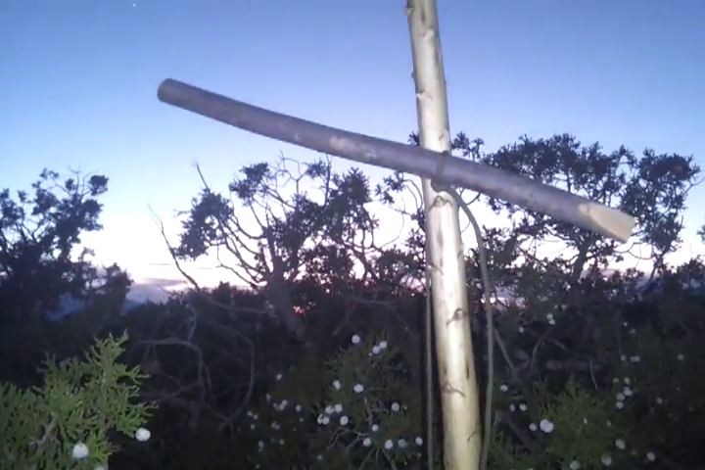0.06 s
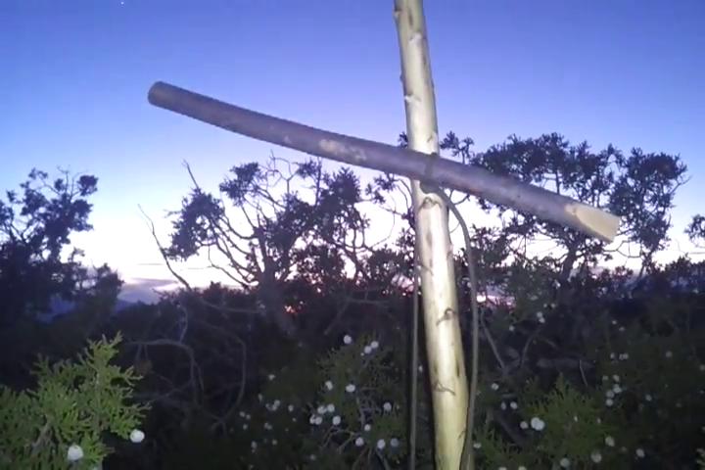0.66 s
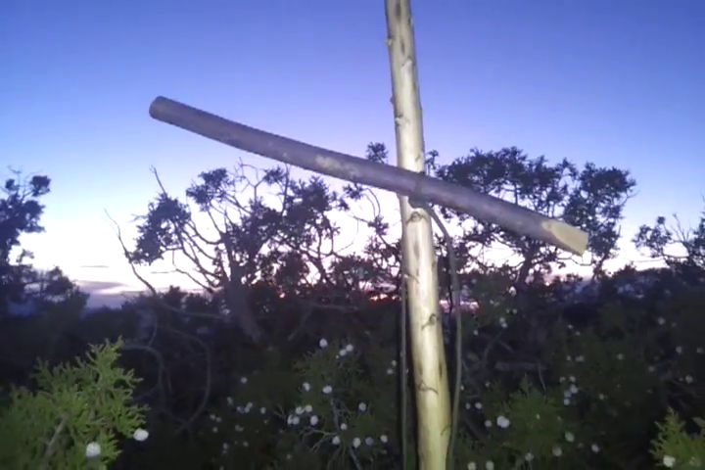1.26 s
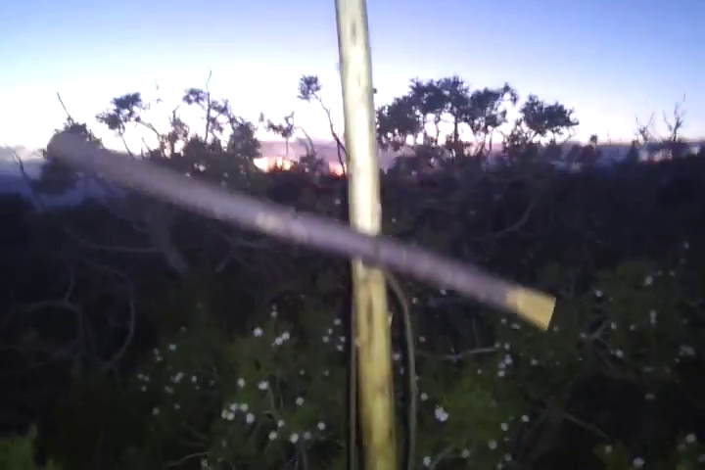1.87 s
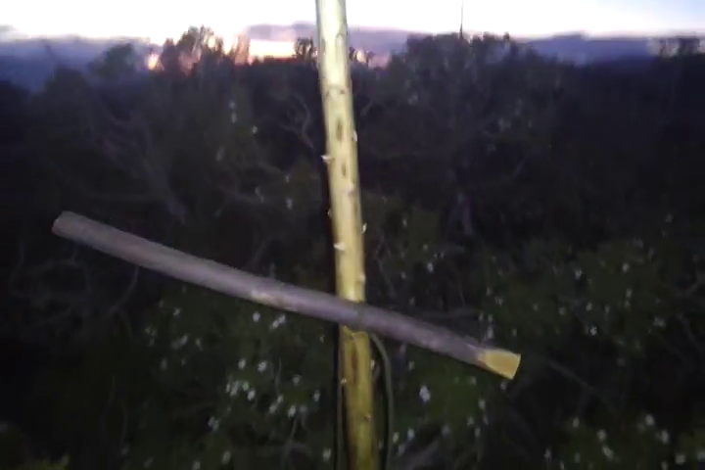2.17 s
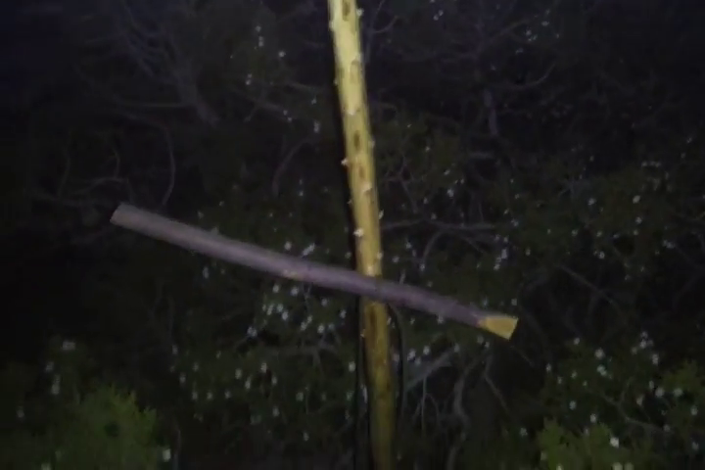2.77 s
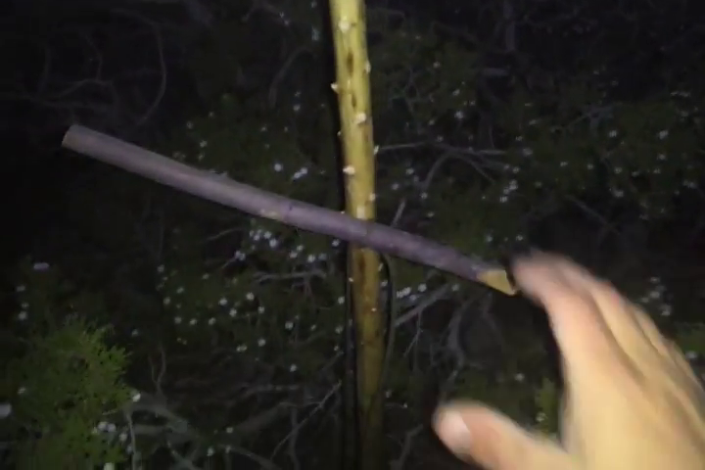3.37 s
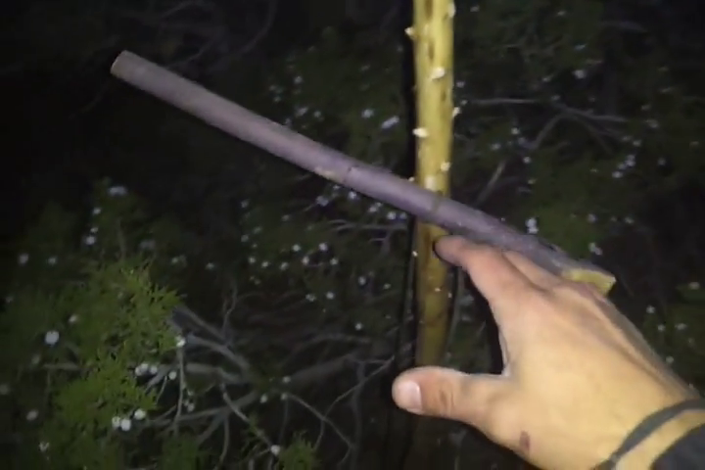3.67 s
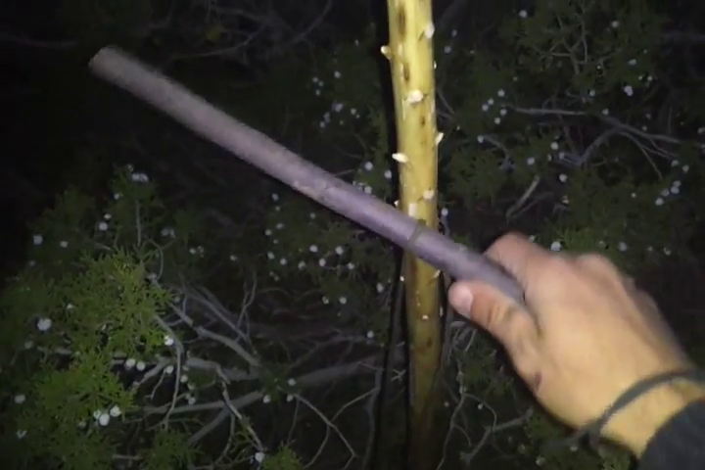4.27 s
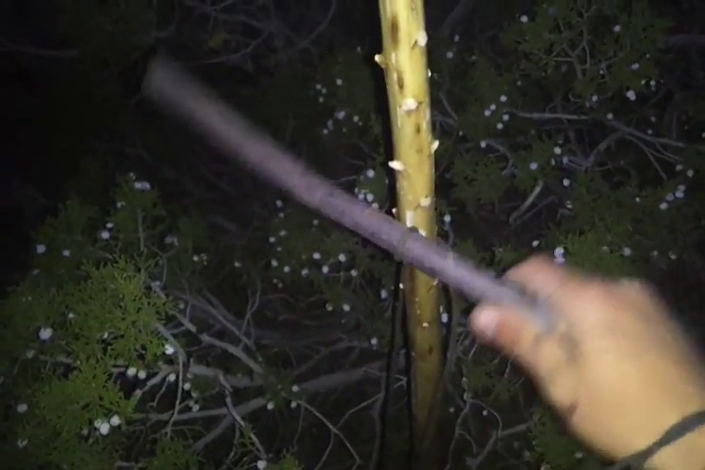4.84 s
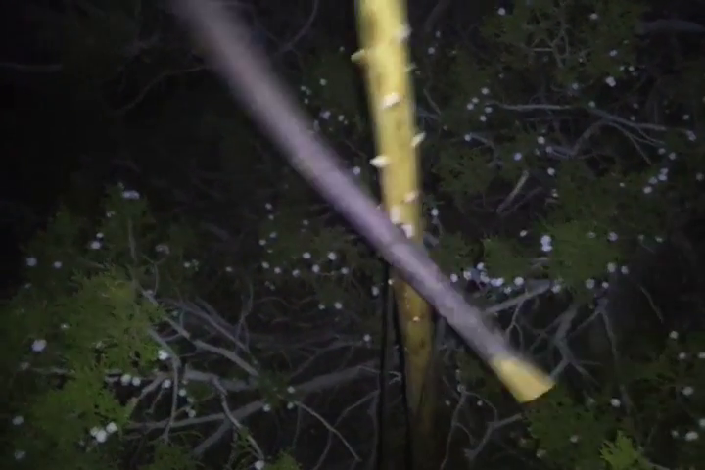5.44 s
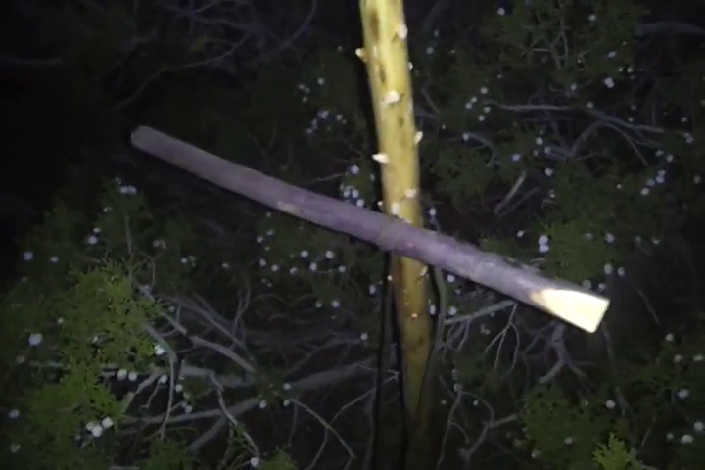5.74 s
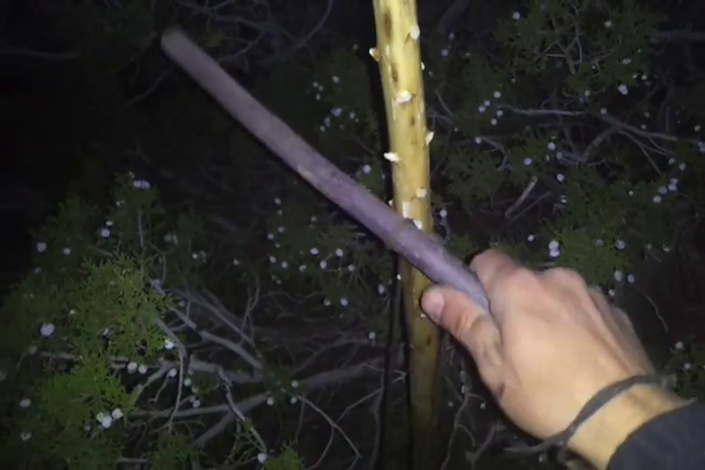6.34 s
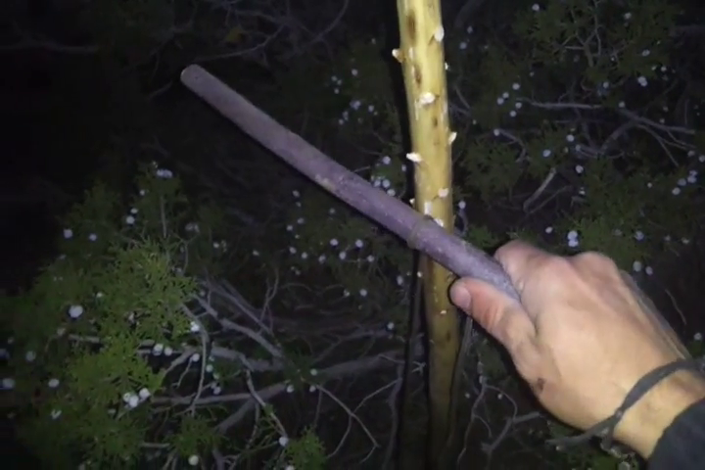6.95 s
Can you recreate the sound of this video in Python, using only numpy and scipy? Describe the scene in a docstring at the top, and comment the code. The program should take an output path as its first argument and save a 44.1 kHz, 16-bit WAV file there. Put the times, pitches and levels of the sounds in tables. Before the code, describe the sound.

Clothes rustle and twigs tick over a quiet outdoor hush, then a wooden perch scrapes, clacks loudly and is grabbed again.

```python
"""A wooden perch at dusk

In still scrub, someone with a hand-held camera works a perch wedged in a pole. It scrapes in its hole
by stick-slip friction, is let go with a rattling clack as impacts ring the wood, and is gripped again.
Twigs tick, clothes rustle by friction, and turbulent air bumps the microphone over a steady hush."""
import sys
import numpy as np
from scipy import signal
from scipy.fft import rfft, irfft, next_fast_len
from scipy.io import wavfile
from scipy.ndimage import map_coordinates

SR = 44100
rng = np.random.default_rng(int(sys.argv[2]) if len(sys.argv) > 2 else 0)


def to_wav(s):
    """Save 16-bit WAV."""
    ch = np.atleast_2d(s).T  # columns
    pcm = np.round(np.clip(ch, -1, 1) * 32767)  # PCM
    wavfile.write(sys.argv[1], SR, pcm.astype(np.int16))


N = 317961

# impacts of perch on pole: t/s, level/dB, body gain/dB, edge gain/dB, share of the free ring time
IMPACTS = [(5.4092, -35.5, -20, 42, 0.26), (5.45, -27.5, -12, -8, 0.89), (5.4576, -32, 2.5, 4, 0.79),
           (5.4624, -36, 11, 9, 0.9), (5.4845, -38, 15, -18, 0.95), (5.4905, -40, 6, -5, 1),
           (5.4956, -40, 10, -9, 0.8), (5.519, -34, 4.5, -7, 0.78), (5.574, -61, -4, -7, .3),
           (5.607, -56, 2, -2, 1), (5.623, -57, 9, -3, 1), (5.7476, -62, 4, 9, 0.96)]
# modes of perch and pole: f/Hz, bandwidth/Hz, level/dB
WOOD_MODES = [(287, 84, -6.5), (340, 33, -2.5), (835, 70, -12), (1043, 48, -1.5), (1155, 68, -9),
              (1250, 110, -8), (1450, 64, -6), (1660, 61, -12), (1830, 79, -9), (2080, 61, -2),
              (2640, 87, -14.5), (3150, 60, -10), (3150, 33, -6.5), (4280, 56, -1), (4580, 60, 1),
              (4860, 57, -8), (5580, 130, -5.5), (6140, 54, -10), (6420, 66, -6)]
# spectrum of the contact noise: f/Hz, level/dB
CRACK_SPECTRUM = [(88, -52.5), (150, -19), (291, -6), (512, -17.5), (1030, -5), (1210, -12.5), (2320, -4),
                  (3130, 2), (3750, -11), (5590, -14), (7920, -36), (10300, -66), (17400, -120)]


def clack():
    """Impact excitation: each contact gives a pulse, a short crack and the damped modes of the wood."""
    out, t = np.zeros(N), np.arange(SR // 6) / SR
    t60 = lambda width: np.log(1000) / np.pi / width
    for start, db, body_db, edge_db, share in IMPACTS:
        fade = lambda free_t60: amp(-60 * t / (free_t60 * share))
        ring = np.zeros(len(t))
        for hz, width, mode_db in WOOD_MODES:
            strength = amp(mode_db + rng.normal(0, 1)) * np.sqrt(width)
            phase = 2 * np.pi * hz * t + rng.normal(0, 1)  # the modes start roughly in step
            ring -= strength * np.sin(phase) * fade(t60(width))
        noise = filtered(rng.standard_normal(len(t)), colour(CRACK_SPECTRUM))
        crack = band(noise, 500, 2820) * fade(0.045) + band(noise, 2590, 5800) * fade(0.031)
        pulse = -band(t == 0, 490, 5900)
        hit = unit(ring) + amp(-1) * unit(crack) + amp(-11) * unit(pulse)
        # a glancing contact is all edge, a square one has body
        body = amp(body_db) * band(hit, 260, 1500, order=1)
        middle = amp(-5) * band(hit, 1200, 4000, order=1)
        edge = amp(edge_db + 1.5) * band(hit, 4930, 5520, order=1)
        add(out, start, amp(db) * unit(band(body + middle + edge, 260, 8000, order=4)))
    return out


# turns of the perch in its hole: t/s, duration/s, level/dB, fall over the stroke/dB
PERCH_TURNS = [(3.925, 0.082, -50.5, 6), (4.13, 0.083, -52.5, -3.5), (4.37, .16, -58, -2),
               (4.665, 0.055, -58, -4), (4.82, 0.092, -57, -2.5), (4.965, 0.15, -51.5, -3.5),
               (5.115, 0.066, -49.5, 4.5), (5.3, 0.1, -52.5, 0), (5.385, 0.036, -48.5, -5),
               (5.413, 0.048, -40, -7), (5.47, 0.034, -37, -2), (5.547, 0.015, -42.5, -2),
               (5.578, 0.017, -44.5, -1), (5.63, 0.092, -54, -3), (6.262, 0.013, -41.5, -3),
               (6.275, 0.11, -44, 18), (6.405, 0.14, -48, 14.5), (7.18, 0.051, -52, -1)]
# modes of the rubbed perch: f/Hz, bandwidth/Hz, level/dB
PERCH_MODES = [(1734, 74, -3.5), (2040, 170, -4), (3080, 137, -2.5), (4616, 235, 3.5), (5280, 1830, -11),
               (6220, 240, -3), (6600, 110, -9)]
# jolts as the hand lands or the perch settles: t/s, peak level/dB
PERCH_JOLTS = [(3.453, -33), (4.198, -36), (5.709, -35), (6.261, -26), (6.267, -26)]


def scrape():
    """Stick-slip friction: dry fibres catch and slip, driving the perch's modes; a jolt rings them."""
    response = lambda hz: resonances(PERCH_MODES)(hz) + amp(-20) * (hz > 500) / (1 + (hz / 6500) ** 8)
    bark_grip = amp(2.5 * wobble(80))
    slips = unit(filtered(grains(per_s=3000, spread_db=5), response))
    out = strokes(PERCH_TURNS) * bark_grip * slips
    impulse = np.arange(SR // 16) == 0
    ring = filtered(impulse, resonances(PERCH_MODES[:4]))
    for start, db in PERCH_JOLTS:
        add(out, start, amp(db) * ring / np.abs(ring).max())
    return out


# flicks of twigs and sleeve (the row at 3.456 s is the hand landing on the perch): t/s, relative level/dB,
# f/Hz, treble share/dB
TWIG_FLICKS = [(0.289, -26, 785, -11.5), (.513, -41, 1500, 0), (.563, -46, 2500, -3), (.727, -45, 2500, -4),
               (1.475, -24, 1150, -27), (1.501, -27.5, 1250, -15), (1.566, -30, 1650, -30),
               (1.899, -30.5, 1370, -12), (1.999, -35, 2110, -19.5), (2.01, -28.5, 1800, -21),
               (2.025, -25.5, 2240, -29), (2.095, -27, 1950, -29), (2.106, -28, 2080, -22),
               (2.416, -33, 1450, -8), (2.456, -36, 1350, -6.5), (2.848, -28, 1380, -11.5),
               (2.969, -34, 2760, -21), (3.086, -32.5, 2260, -6.5), (3.123, -30.5, 2560, -14),
               (3.447, -22.5, 700, -12.5), (3.456, -27.5, 1000, -8), (3.551, -27.5, 2360, -5.5),
               (3.695, -37, 2300, -15), (3.757, -33.5, 1890, -29), (3.887, -33.5, 1620, -10),
               (3.91, -32, 1890, -23), (3.952, -30, 1430, -19), (3.988, -29, 1550, -16),
               (4.423, -30.5, 1320, -1), (4.526, -32.5, 1500, 0), (6.3032, -28.5, 3150, 0)]
# snaps of dry needles: t/s, relative level/dB
NEEDLE_SNAPS = [(1.392, -35.5), (6.8149, -53)]


def ticks():
    """Damped transients: needles snap; twigs and folds give a dull knock with a brighter edge."""
    out, t = np.zeros(N), np.arange(SR // 12) / SR
    burst = lambda t60: rng.standard_normal(len(t)) * amp(-60 * t / t60) + 7 * (t == 0)
    for start, db in NEEDLE_SNAPS:
        add(out, start, amp(db - 22) * unit(band(burst(0.0083), 6500, 9300, order=3)))
    for start, db, hz, treble_db in TWIG_FLICKS + faint_flicks():
        t60 = 0.03 * (1000 / hz) ** 0.42  # higher flicks die sooner
        core = unit(band(burst(t60), hz * 0.54, hz * 1.42, order=3))
        skirt = unit(band(burst(t60), hz * 0.32, hz * 2.44, order=3))
        knock = unit(core + amp(-4.5) * skirt)
        edge = unit(band(burst(t60), 3900, 5780))
        bright = min(amp(treble_db), .98)
        add(out, start, amp(db - 22.5) * (np.sqrt(1 - bright ** 2) * knock + bright * edge))
    return out


# rubbing of the jacket as the body moves: t/s, level/dB
JACKET_RUB = [(1.4, -65), (1.6, -55), (1.85, -55.5), (2.2, -53.5), (2.6, -57), (2.8, -62.5), (2.9, -54),
              (3.25, -61), (3.65, -54.5), (3.9, -57.5), (4.3, -61), (4.7, -57.5), (5.15, -63), (5.25, -67)]
# spectrum of the swish: f/Hz, level/dB
FABRIC_SPECTRUM = [(290, -40.5), (500, -1), (668, -3.5), (1310, -9.5), (1420, -6.5), (1820, -6),
                   (3490, -10), (4000, -11.5), (5470, -10.5), (7060, -16.5), (7920, -30.5), (10300, -72),
                   (17400, -120)]
# whistle of the weave: f/Hz, bandwidth/Hz, level/dB
WEAVE_PEAKS = [(3500, 190, 1), (4800, 390, -4.5)]
# folds scuffing over each other: t/s, duration/s, level/dB, fall over the stroke/dB
FOLD_SCUFFS = [(1.59, 0.088, -57.5, 6), (1.98, 0.054, -54, -2), (2.63, .04, -53, 1.5),
               (2.86, 0.048, -44, 6.5), (2.935, 0.12, -48.5, 0), (3.57, .06, -53.5, 3),
               (3.89, 0.15, -55.5, 1.5), (4.15, 0.023, -51, -1)]


def cloth():
    """Friction noise: fine slips swish, the weave whistles when rubbed fast, crossing folds crackle."""
    rub = level(JACKET_RUB)
    clumps = amp(0.84 * wobble(40))
    swish = rub * clumps * unit(filtered(grains(per_s=3500, spread_db=5), colour(FABRIC_SPECTRUM)))
    weave = unit(filtered(rng.standard_normal(N), resonances(WEAVE_PEAKS)))
    whistle = amp(-60) * (rub / rub.max()) ** 3.1 * weave
    folds = strokes(FOLD_SCUFFS) + rub * amp(-11.5 + 2 * np.tanh(wobble(25)))
    crackle = folds * unit(band(grains(per_s=600, spread_db=3.5), 950, 3100))
    return swish + whistle + crackle


def faint_flicks(per_s=4.6, centre_hz=1900, treble_db=-7.5):
    """A random point process: rows of small flicks whose level follows the jacket's rubbing."""
    times, rub_db = np.transpose(JACKET_RUB)
    rows = []
    for when, size, pitch in rng.random((int(per_s * N / SR), 3)) * [N / SR, 1, 1]:
        db = np.interp(when, times, rub_db) + 14 + 1.5 * (2 * size - 1)
        rows.append((when, db, centre_hz * 2 ** (pitch - .5), treble_db))
    return rows


# puffs of air on the microphone (the row at 5.475 s is instead a low thump under the clack): t/s, relative
# level/dB, rise/s, decay/s, eddy f/Hz
AIR_PUFFS = [(1.801, -26, .012, 0.021, 300), (1.945, -37.5, 0.0068, 0.042, 160.2),
             (2.015, -40, .04, .03, 170), (2.23, -30.5, .016, 0.038, 219.5),
             (2.362, -41.5, .008, 0.013, 162.3), (2.6, -43, .015, 0.035, 170.8),
             (2.705, -36.5, 0.049, .025, 200), (2.867, -37.5, .01, 0.043, 137.6),
             (3.057, -35.5, .012, 0.046, 131.1), (3.199, -42.5, 0.037, .06, 148.8),
             (3.615, -34, 0.061, 0.021, 187.5), (4.015, -39, .008, 0.018, 171),
             (4.048, -35.5, 0.0086, .025, 221.6), (4.097, -39.5, 0.014, 0.039, 185.6),
             (4.529, -41.5, 0.097, 0.015, 165.5), (4.576, -38, 0.0063, .012, 320),
             (4.667, -42, .012, .015, 191), (4.785, -40.5, 0.033, 0.096, 143),
             (4.898, -37, 0.023, 0.018, 210), (5.475, -44.5, .012, 0.043, 300),
             (5.968, -41, 0.044, 0.01, 150.6), (6.104, -34, .02, .018, 290)]
# air drifting past between puffs: t/s, relative level/dB
AIR_DRIFT = [(1.45, -67), (1.7, -67.5), (2.1, -48.5), (2.53, -55), (3.1, -47), (3.4, -51), (3.75, -51),
             (4, -55), (4.28, -66), (4.45, -49.5), (4.95, -54), (5.38, -66.5), (5.57, -53), (5.8, -70),
             (6.26, -51), (6.45, -73.5), (6.6, -60), (7.2, -68)]
# spectrum of the buffeting: f/Hz, level/dB
BUFFET_SPECTRUM = [(15, -46), (25, -6.5), (99, 3), (146, 1.5), (226, -5.5), (450, -14.5), (580, -39),
                   (990, -120)]


def air():
    """Turbulent pressure: a lumpy rumble, with an eddy at each puff's peak; strong puffs flutter."""
    clock = np.arange(N) / SR
    puffs = sum(amp(db) * np.exp(-np.maximum((peak - clock) / rise, (clock - peak) / decay))
                for peak, db, rise, decay, _ in AIR_PUFFS)
    flow = np.hypot(amp(0.5) * level(AIR_DRIFT), amp(-1.5) * puffs)
    lumps = amp(3.5 * wobble(35))
    rumble = unit(filtered(rng.standard_normal(N), colour(BUFFET_SPECTRUM)))
    flutter = unit(band(rng.standard_normal(N), 300, 650, order=3))
    out = flow * lumps * rumble + amp(-36) * (puffs / puffs.max()) ** 1.93 * flutter
    t = np.arange(-SR // 16, SR // 16) / SR
    swirl = np.exp(0.388 * np.tanh(wobble(380)))  # no eddy turns at an even pace
    for peak, db, _, _, hz in AIR_PUFFS:
        cycles = np.cumsum(hz * swirl[round(peak * SR):][:len(t)]) / SR + rng.random()
        eddy = np.sin(2 * np.pi * cycles) / np.cosh(t * hz / 1.05)  # one or two swings of pressure
        add(out, peak + t[0], amp(db + 7) * eddy)
    return band(out, 30, 1300)


# spectrum of the still evening and its hiss: f/Hz, level/dB
HUSH_SPECTRUM = [(18, -62.5), (30, -25), (140, -12.5), (251, -12.5), (282, -14), (317, -13), (449, -10),
                 (581, -10.5), (652, -7.5), (884, -10), (1120, -11.5), (1620, -14.5), (1910, -16),
                 (6270, -21.5), (7920, -37.5), (10300, -66), (17400, -120)]


def evening():
    """Ambient noise: a broadband hush, and a far narrowband drone that fades as the camera tips down."""
    hush = amp(-58.4) * unit(filtered(rng.standard_normal(N), colour(HUSH_SPECTRUM)))
    drone = unit(filtered(rng.standard_normal(N), lambda hz: resonances([(1115, 105, 0)])(hz) ** 2))
    drone_gain = level([(0, -65.5), (.9, -72), (1.4, -61), (2, -83.5)])
    return hush * amp(0.11 * wobble(4.5)) + drone * drone_gain


def scatter(x, t60=0.28, rise_s=0.0073):
    """Diffuse reflection: bushes and ground return a short, exponentially decaying tail."""
    t = np.arange(SR // 2) / SR
    envelope = amp(-60 * t / t60) * (1 - np.exp(-t / rise_s))
    tail = band(rng.standard_normal(len(t)), 300, 6000) * envelope
    return signal.fftconvolve(x, tail / np.linalg.norm(tail))[:N]


def amp(db):
    """Amplitude ratio of a level in decibels."""
    return 10 ** (np.asarray(db) / 20)


def unit(x):
    """Normalisation to rms 1."""
    return x / np.sqrt(np.mean(x ** 2) + 1e-20)


def colour(points):
    """Spectral envelope through rows of f/Hz, level/dB."""
    f, db = np.transpose(points)
    return lambda hz: amp(np.interp(np.log(hz + 1), np.log(f + 1), db))


def resonances(modes):
    """Modal superposition: second-order resonators summed with alternating sign."""
    return lambda f: sum((-1) ** k * amp(db) * 1j * f * width / (hz * hz - f * f + 1j * f * width)
                         for k, (hz, width, db) in enumerate(modes))


def filtered(x, response):
    """Linear filtering: the spectrum of x times a frequency response."""
    size = next_fast_len(len(x) + 4096)
    return irfft(rfft(x, size) * response(np.fft.rfftfreq(size, 1 / SR)), size)[:len(x)]


def band(x, lo_hz, hi_hz, order=2):
    """Causal band-pass filtering."""
    return signal.sosfilt(signal.butter(order, [lo_hz, hi_hz], 'band', fs=SR, output='sos'), x)


def level(rows):
    """Amplitude envelope through rows of t/s, level/dB; silent outside them."""
    times, db = np.transpose(rows)
    return amp(np.interp(np.arange(N) / SR, times, db, left=-np.inf, right=-np.inf))


def strokes(rows, edge_share=0.21):
    """Amplitude envelope of rubs that take hold, fall or rise evenly in level, and let go."""
    t = np.arange(N) / SR
    grip = lambda u: (np.tanh(u / edge_share) - np.tanh((u - 1) / edge_share)) / 2
    return sum(amp(db - fall_db * np.clip((t - start) / length, 0, 1)) * grip((t - start) / length)
               for start, length, db, fall_db in rows)


def wobble(per_s):
    """Random modulation: a smooth curve through per_s Gaussian values a second."""
    return map_coordinates(rng.standard_normal(int(N * per_s / SR) + 4), [np.arange(N) * per_s / SR])


def grains(per_s, spread_db):
    """Shot noise: tiny catches of random sign and size, rms 1."""
    impulses = (rng.random(N) < per_s / SR) * rng.choice([-1, 1], N)
    return unit(impulses * amp(spread_db * np.clip(rng.standard_normal(N), -2, 2)))


def add(track, start, sound):
    """Superposition of a sound on a track, from start in seconds."""
    part = track[round(start * SR):][:len(sound)]
    part += sound[:len(part)]


def scene():
    """Superposition of the close sounds, their faint scatter, cloth, air and evening hush."""
    near = clack() + scrape() + ticks()
    return (near + amp(-23.5) * scatter(near) + cloth() + air() + evening())[None]


def record(dry):
    """Band limiting: the camera thins the deep bass and cuts off the high treble."""
    thin = signal.sosfilt(signal.butter(1, 40, 'high', fs=SR, output='sos'), dry)
    return signal.sosfilt(signal.cheby2(14, 60, 8575, fs=SR, output='sos'), thin)


dry = scene()
out = record(dry)
to_wav(out)
```